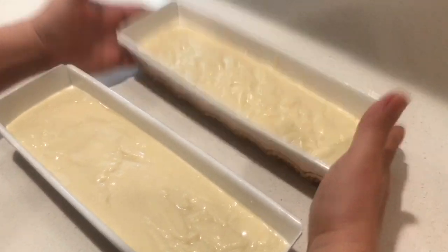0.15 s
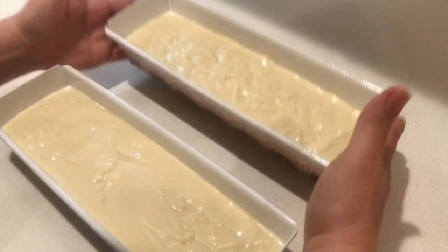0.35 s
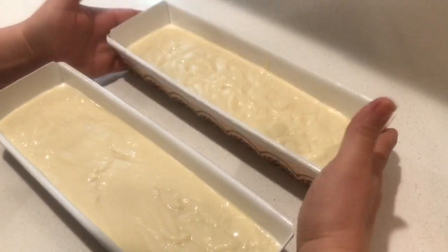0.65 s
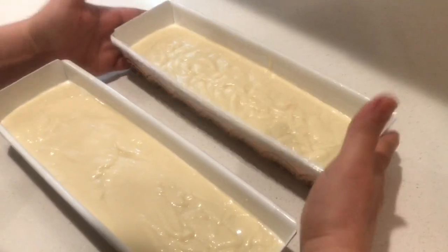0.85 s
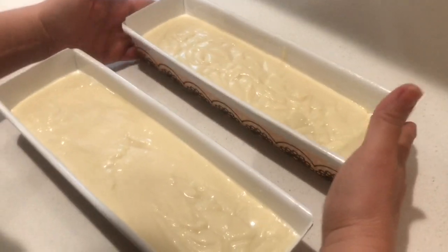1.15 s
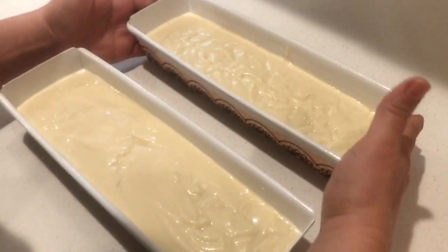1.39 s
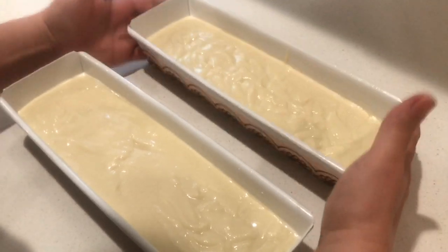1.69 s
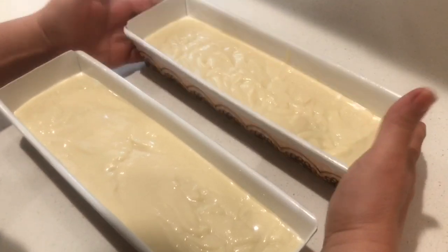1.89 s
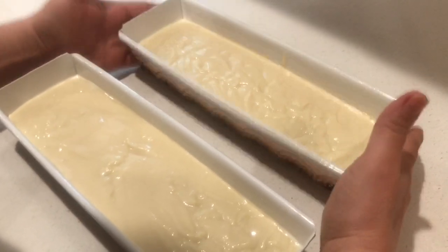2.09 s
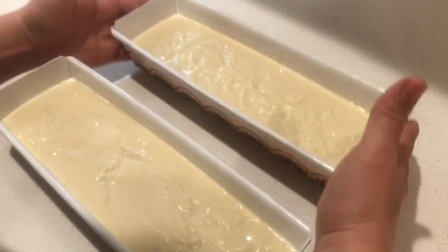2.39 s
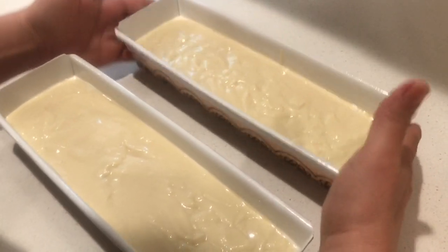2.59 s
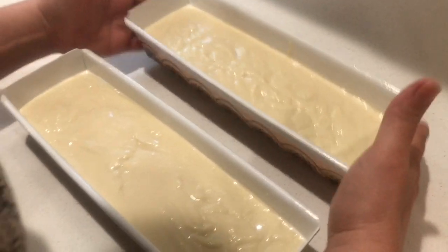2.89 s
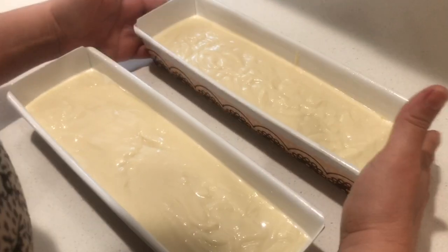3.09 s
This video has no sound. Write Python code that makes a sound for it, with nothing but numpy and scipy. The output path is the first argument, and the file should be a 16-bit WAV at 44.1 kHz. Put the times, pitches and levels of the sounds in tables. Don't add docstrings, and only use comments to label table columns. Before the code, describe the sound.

A card loaf pan full of batter is knocked twelve times on a stone counter, each a hollow knock and instant bright slap, close to the microphone in a small kitchen with a low appliance hum.

```python
import sys
import numpy as np
from scipy import signal
from scipy.io import wavfile

SR = 44100
rng = np.random.default_rng(int(sys.argv[2]) if len(sys.argv) > 2 else 0)


def generate_wav(signal):
    frames = np.transpose(np.atleast_2d(signal))
    scaled = np.clip(frames, -1, 1) * 32767
    pcm = np.round(scaled).astype(np.int16)
    wavfile.write(sys.argv[1], SR, pcm)


def voltage_ratio(level):
    return 10 ** (np.asarray(level, float) / 20)


N = 143325


def rms_one(x):
    return x / np.sqrt(np.mean(x ** 2) + 1e-20)


def at_hz(points, hz, column=1):
    points = np.array(points)
    return np.interp(np.log(hz), np.log(points[:, 0]), points[:, column])


def drift(rate):
    r = np.exp(-80 * np.pi * rate / SR)
    slow = signal.lfilter([1], [1, -2 * r, r * r], rng.standard_normal(N // 40 + 2002))[2000:]
    return np.interp(np.arange(N) / 40, np.arange(len(slow)), rms_one(slow))


def bands(size):
    white = rng.standard_normal((2, size + SR // 4))
    edges = 25 * 2 ** np.arange(0, 9.6, .5)
    out = []
    for k, (lo, hi) in enumerate(zip(edges, edges[1:])):
        sos = signal.butter(2, [lo, hi], "band", fs=SR, output="sos")
        out.append((np.sqrt(lo * hi), signal.sosfilt(sos, white[k % 2])[-size:]))
    return out


def ring(clicks, hz, t60):
    r, w = voltage_ratio(-60 / (t60 * SR)), 2 * np.pi * hz / SR
    return signal.lfilter([0, np.sin(w)], [1, -2 * r * np.cos(w), r * r], clicks + 1e-18)


def resonance(x, hz, cycles):
    r, w = voltage_ratio(-60 * hz / (cycles * SR)), 2 * np.pi * hz / SR
    return signal.lfilter([.5, 0, -.5], [1, -2 * r * np.cos(w), r * r], x + 1e-18)


# (time [s], level [dB])
HUM = [(0, -27.5), (.17, -39), (.3, -34), (.42, -39), (.55, -36.5), (.8, -35), (1.05, -35.5), (1.2, -33.5),
       (1.32, -36.5), (1.46, -31), (1.6, -35.5), (1.88, -36.5), (2.05, -32.5), (2.2, -35), (2.5, -34.5),
       (2.85, -34.5), (3.05, -38), (3.25, -31)]
# (pitch [Hz], level per Hz [dB])
AIR = [(40, -2), (80, -7), (140, -8), (230, -14.5), (550, -17), (950, -26.5), (1500, -29), (3500, -35),
       (8000, -45.5)]


def appliance():
    t = np.arange(N) / SR
    hum_hz, mains_hz, whine_hz, whine_width_hz = 58.5, 120, 911, 80
    hum = voltage_ratio(np.interp(t, *np.transpose(HUM))) * np.sin(0.15 + 2 * np.pi * hum_hz * t)
    buzz_level = voltage_ratio(-47.5 + 2.5 * drift(1.4))
    buzz = buzz_level * np.sin(2 * np.pi * mains_hz * t + 0.53 * drift(2.3))
    air = 0
    for hz, band in bands(size=N):
        rolloff_db = 11 * max(np.log2(hz / 8000), 0)
        air = air + voltage_ratio(at_hz(AIR, hz) - rolloff_db + 2.8 * drift(2.4)) * band
    peak = signal.iirpeak(whine_hz, whine_hz / whine_width_hz, fs=SR)
    whine = rms_one(signal.lfilter(*peak, rng.standard_normal(N)))
    return voltage_ratio(-69.5) * whine + np.sqrt(2) * (hum + buzz) + voltage_ratio(-47) * rms_one(air)


# (time [s], length [s], level [dB], pitch [Hz])
RUBS = [(0.054, 0.011, -69.5, 8000), (0.303, 0.012, -59, 11500), (0.545, 0.0078, -54, 8500),
        (0.612, 0.0036, -55, 7000), (.665, .01, -63, 9000), (1.247, 0.028, -53, 4830),
        (1.281, 0.019, -63, 6000), (1.294, 0.0027, -46.5, 8000), (1.407, 0.012, -56, 4500),
        (1.475, 0.035, -56.5, 4000), (1.479, 0.034, -54, 6000), (1.495, 0.03, -70, 9000),
        (1.776, 0.0081, -59, 5000), (2.07, 0.025, -61, 4000), (2.616, 0.011, -77.5, 5000),
        (2.846, 0.007, -57, 5000), (2.947, 0.0041, -37.5, 800), (2.956, 0.005, -52, 1600),
        (1.486, 0.014, -58, 1500), (2.942, 0.0045, -66, 6000), (3.145, 0.0053, -57.5, 6000)]


def fingers():
    grains_per_s, q = 5000, 5
    out = np.zeros(N + SR)
    t = np.arange(SR // 8) / SR
    for s, length, db, hz in RUBS:
        draw = rng.random((2, len(t)))
        grains = (draw[0] < grains_per_s / SR) * (2 * draw[1] - 1) * np.sqrt(3 * SR / grains_per_s)
        grains = grains * np.clip(np.sin(np.pi * np.minimum(t / (1.5 * length), 1)), 0, 1)
        narrow = signal.lfilter(*signal.iirpeak(hz, q, fs=SR), grains) * np.sqrt(q * SR / hz / np.pi)
        around = signal.butter(1, [hz / 2, min(2 * hz, .45 * SR)], "band", fs=SR)
        wide = signal.lfilter(*around, grains)
        i = int(s * SR)
        out[i:i + len(t)] += voltage_ratio(db) * (narrow + voltage_ratio(-4.5) * wide)
    return out[:N]


# (pitch [Hz], time to fall 60 dB [s], level [dB])
ROOM = [(98, 1, -31.5), (290, 0.36, -27.5), (624, 0.28, -23), (1500, 0.34, -24), (4000, 0.3, -24),
        (8000, 0.33, -24.5), (15200, 0.34, -30)]


def kitchen(x):
    early_s, early_db, delay_s = 0.005, 21, 0.0017
    t = np.arange(SR // 2) / SR
    tail = 0
    for hz, band in bands(size=len(t)):
        tail = tail + voltage_ratio(at_hz(ROOM, hz, column=2) - 60 * t / at_hz(ROOM, hz)) * band
    tail = tail * (1 + voltage_ratio(early_db) * np.exp(-t / early_s))
    tail = tail * np.clip(t / delay_s, 0, 1) ** 2
    return signal.fftconvolve(x, tail * voltage_ratio(-17))[:N]


# (pitch [Hz], level [dB], time to fall 60 dB [s])
THUD = [(62.6, -30.5, 0.059), (113, -24.5, 0.14), (151.1, -21.5, 0.11), (210, -26.5, 0.12),
        (298.6, -23, 0.064), (332, -25, 0.049), (572, -15, 0.061), (636, -22, 0.064)]
# (pitch [Hz], level [dB], time to fall 60 dB [s])
WALLS = [(881, -13.5, 0.013), (1000, -16, 0.014), (1200, -16, 0.012), (1402, -13.5, 0.014),
         (1750, -8.5, 0.0061)]
# (pitch [Hz], level [dB])
CRACK = [(2300, -6.5), (3200, -3.5), (4100, -2.5), (5200, -1.5), (6200, 0), (7400, -2), (8750, -3.5),
         (10500, -10.5), (12500, -15.5), (14500, -28.5)]


def pan_body(clicks, row, cycles, own_db, shove_db, spread_db):
    s, db, own_hz, crack_db, thud_db = row
    soft = np.exp(-2 * np.pi * 2620 / SR)
    one_way = abs(clicks) / abs(clicks).sum()
    push, shove = signal.lfilter([1 - soft], [1, -soft], [clicks, one_way])
    body = voltage_ratio(own_db) * ring(clicks, own_hz, cycles / own_hz)
    for k, (hz, g, t60) in enumerate(THUD):
        body += (-1) ** k * voltage_ratio(shove_db + thud_db + g + spread_db[0, k]) * ring(shove, hz, t60)
    for k, (hz, g, t60) in enumerate(WALLS):
        body += (-1) ** k * voltage_ratio(thud_db + g + spread_db[1, k]) * ring(push, hz, t60)
    for k, (hz, g) in enumerate(CRACK):
        body += (-1) ** k * voltage_ratio(crack_db + g + spread_db[2, k]) * resonance(clicks, hz, 7)
    return voltage_ratio(db + 6.5) * body


def contacts(rows, chatter_s, cycles, own_db, shove_db):
    chatter_per_s, rise_s, spread_db = 6000, 0.0013, 2
    size = SR // 3
    close, to_room = np.zeros((2, N + SR))
    t = np.arange(size) / SR
    for row in rows:
        draw = rng.random((2, size))
        spread = spread_db * rng.standard_normal((3, 10))
        clicks = (draw[0] < chatter_per_s / SR) * (2 * draw[1] - 1)
        clicks = clicks * np.exp(-t / chatter_s) * np.minimum(0.37 + t / rise_s, 1)
        clicks[0] = 0.42
        clicks = clicks / np.sqrt(np.sum(clicks ** 2))
        single = 1.0 * (t == 0)
        i = int(row[0] * SR)
        close[i:i + size] += pan_body(clicks, row, cycles, own_db, shove_db, spread)
        to_room[i:i + size] += pan_body(single, row, cycles / 2, own_db, shove_db, spread / 2)
    return close[:N] + kitchen(to_room[:N])


# (time [s], peak level [dB], wall pitch [Hz], crack level [dB], thud level [dB])
LANDS = [(.2074, -1, 1325, -4, -29), (.4502, -3.5, 1350, -6.5, -4), (.6793, -7.5, 1200, -7, -8.5),
         (.8942, -4.5, 1220, -9.5, -1.5), (1.098, -8.5, 1330, -28, -5), (1.6763, -6, 1100, -3.5, 1.5),
         (1.9083, -8.5, 1010, -13, -10), (2.1288, -9.5, 1150, -2, -6), (2.3397, -7, 1060, -3.5, -0.5),
         (2.5547, -7.5, 1000, 1, -14), (2.7528, -11, 944, -7.5, -2), (2.9685, -3, 1320, -7, -1.5)]


def first_end_lands():
    return contacts(LANDS, chatter_s=0.0036, cycles=17.6, own_db=-3.5, shove_db=-7.5)


# (time [s], peak level [dB], crease pitch [Hz], crack level [dB], thud level [dB])
SLAPS = [(.2146, 5, 3430, -2.5, -4.5), (.4585, 0, 9070, -1, -4), (.6828, 0, 3520, -2.5, 0),
         (.9027, 0.5, 5030, -5, -6), (1.1088, -4.5, 4600, -4.5, -0.5), (1.6828, -1.5, 3450, -4.5, -5.5),
         (1.914, -7.5, 4060, -1, 5.5), (2.1368, -4.5, 1750, 3, 0.5), (2.343, 0.5, 3070, -5, -3),
         (2.559, 3, 4000, -7, -2), (2.757, -15, 3050, -2.5, 10), (2.9752, 8.5, 9100, -11.5, -11)]


def other_end_slaps():
    return contacts(SLAPS, chatter_s=.0018, cycles=23.6, own_db=-15.5, shove_db=1.5)


def scene():
    pan = first_end_lands() + other_end_slaps()
    hands = fingers()
    return (pan + hands + kitchen(hands) + appliance())[None]


def low_pass(x):
    return signal.sosfilt(signal.butter(12, 16500, fs=SR, output="sos"), x)


def record(dry):
    low_hz, high_hz, top = 50, 16300, 1.4
    x = signal.sosfilt(signal.butter(4, low_hz, "high", fs=SR, output="sos"), dry)
    x = top * np.tanh(x / top)
    x = signal.sosfilt(signal.cheby2(10, 30, high_hz, fs=SR, output="sos"), x)
    mix = np.clip(x, -1, 1)
    return low_pass(mix)


dry = scene()
out = record(dry)
generate_wav(out)
```